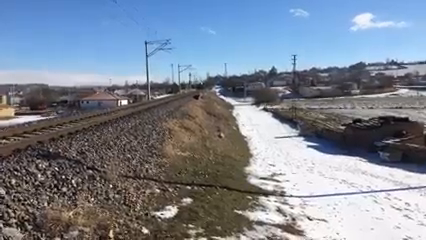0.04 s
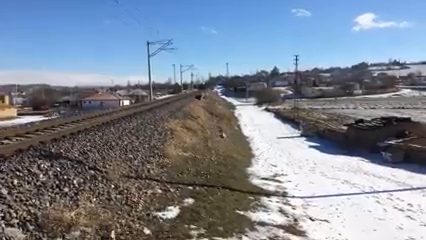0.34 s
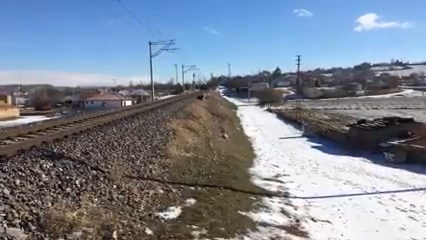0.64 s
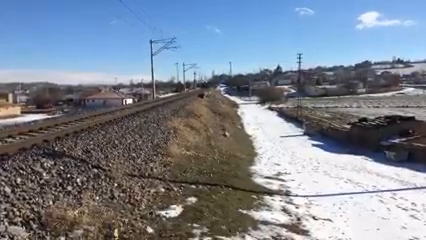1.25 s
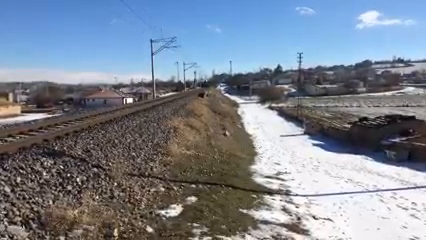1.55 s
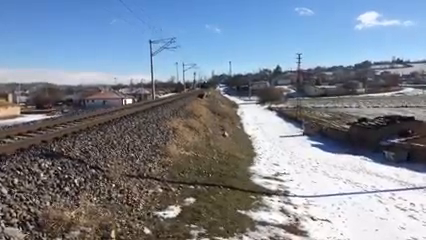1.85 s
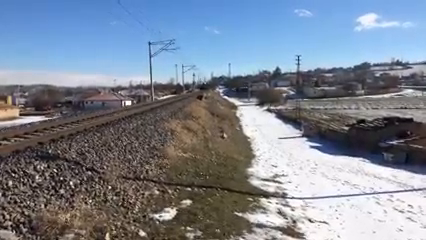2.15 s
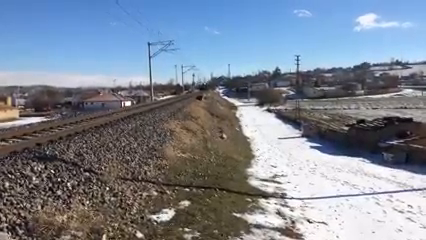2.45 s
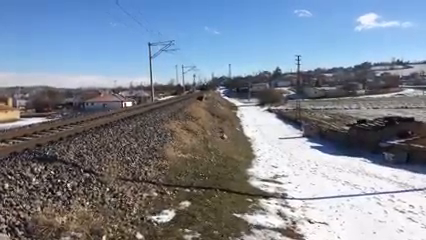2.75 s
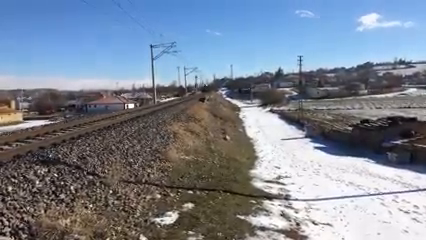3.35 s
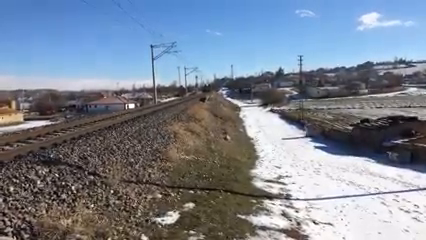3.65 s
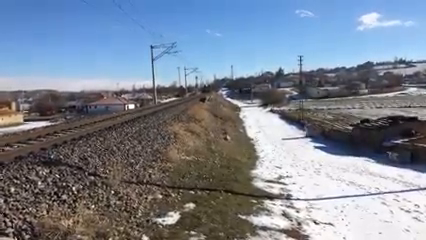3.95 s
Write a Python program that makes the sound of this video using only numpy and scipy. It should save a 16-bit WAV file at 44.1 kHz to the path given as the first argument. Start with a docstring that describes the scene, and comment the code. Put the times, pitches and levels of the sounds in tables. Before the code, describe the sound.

A distant train sets the rails ringing with steady metallic tones, and its roar slowly grows as it nears. Light wind rumbles on the microphone beside the track, bumping it several times midway, over faint open-country hiss.

```python
"""Snowy country, beside an empty track: the rails sing with a train that is still far away.
Its rolling wheels shake the steel, which rings in narrow bands; the roar grows and fills in as it nears.
Light wind rumbles on the microphone and its eddies bump it a few times.
Faint rustles, a tick and two distant chirps lie in the outdoor hiss."""
import sys
import numpy as np
from scipy.fft import rfft, irfft, next_fast_len
from scipy.io import wavfile
from scipy.ndimage import uniform_filter1d, map_coordinates

SR = 44100
rng = np.random.default_rng(int(sys.argv[2]) if len(sys.argv) > 2 else 0)


def generate_wav(sig):
    """Save sig (samples, or channels by samples) to the path in sys.argv[1] as 16-bit PCM at SR."""
    pcm = np.round(np.clip(np.atleast_2d(sig).T, -1, 1) * 32767).astype(np.int16)
    wavfile.write(sys.argv[1], SR, pcm)


N = 176400


def amp(db):
    """Decibels to gain."""
    return 10 ** (np.asarray(db) / 20)


def unit(x):
    """Scale to rms 1."""
    return x / np.sqrt(np.mean(x ** 2) + 1e-20)


def curve(rows):
    """One value per sample from (time [s], value) rows."""
    return np.interp(np.arange(N) / SR, *np.transpose(rows))


def swell(centre_s, half_s):
    """Gaussian rise and fall, peak 1."""
    return np.exp(-((np.arange(N) / SR - centre_s) / half_s) ** 2)


def wobble(knots_per_s):
    """Smooth random curve."""
    return map_coordinates(rng.standard_normal(2000), [np.arange(N) * knots_per_s / SR], mode="mirror")


def filtered(x, response):
    """Apply a gain given as a function of frequency [Hz]."""
    size = next_fast_len(N + SR // 2)
    hz = np.fft.rfftfreq(size, 1 / SR)
    return irfft(rfft(x, size) * response(hz), size)[:N]


def noise(response):
    """Filtered white noise, rms 1."""
    white = rng.standard_normal(next_fast_len(N + SR // 2))
    return unit(filtered(white, response))


def coloured(spectrum):
    """Noise, rms 1, shaped by (frequency [Hz], density [dB]) rows on a log axis."""
    knots_hz, db = np.transpose(spectrum)
    return noise(lambda hz: amp(np.interp(np.log(hz + 1), np.log(knots_hz + 1), db)))


def evened(x, window_s=0.14):
    """Even out slow swings of level; rms 1."""
    power = np.abs(uniform_filter1d(x ** 2, int(window_s * SR))) + 1e-6
    return unit(x / np.sqrt(power))


def ringing(centre_hz, width_hz):
    """Steep-sided resonance shaken at random, steady in level."""
    return evened(noise(lambda hz: 1 / (1 + ((hz - centre_hz) / (0.66 * width_hz)) ** 2)))


def rails(roar_db=-5, roar_growth=1.69, flutter_db=1):
    """Nearing wheels drive the rail resonances and the roar between them, each at its own growth rate."""
    # rolling strength (time [s], level [dB])
    approach = [(0, -42.5), (.4, -41.5), (.55, -41), (.9, -41.3), (1.08, -43), (1.3, -40.5), (1.55, -41),
                (2, -39.5), (2.14, -40.5), (2.3, -38), (2.78, -39), (2.9, -36.7), (3.25, -36.5),
                (3.75, -35.5), (3.92, -34.5)]
    # rail resonances (centre [Hz], width [Hz], level re rolling [dB], growth [dB per dB of approach])
    modes = [(406.5, 17.4, -23, 1.2), (451.6, 25.4, -12.5, 1), (471.6, 15.8, -13, 1.38),
             (579, 88, -16.5, 0.5), (649.4, 18.4, -12.5, 0.47), (710.4, 23, -13, .5), (759, 53, -14.5, 1.2),
             (1035, 31.4, -6, 1.23), (1100, 36, -12.5, 0.2), (1258, 46, -14.5, 1), (1316, 30, -18.5, 1.5),
             (1853.4, 25, -24, 1), (1957, 52, -31.5, 0), (2814, 27, -45.5, 1.5), (3866, 59, -37, .5),
             (4410, 33, -42, 0.5), (6125, 54, -42.5, 1.45), (7110, 250, -35, 0.6), (7140, 56, -40.5, 0.7),
             (12400, 450, -41.5, .8), (12700, 500, -45.5, 1.2), (13718, 60, -47, 0.7)]
    # broad roar (frequency [Hz], relative density [dB])
    roar_spectrum = [(250, -50), (350, -20.5), (420, -14), (470, 0), (500, -20.5), (620, -0.5), (740, 1),
                     (900, -1.5), (1040, 3.5), (1180, -5), (1330, -6.5), (1420, -24), (1600, -20),
                     (1800, -10), (1900, -22), (2400, -34), (4300, -33.5), (5600, -44), (10000, -81),
                     (11500, -41.5), (12600, -44.5), (15000, -60)]
    rolling_db = curve(approach)
    mean_db = rolling_db.mean()
    near_db = rolling_db - mean_db
    ring = sum(amp(db + growth * near_db) * ringing(hz, width_hz) for hz, width_hz, db, growth in modes)
    roar = amp(roar_db + roar_growth * near_db) * coloured(roar_spectrum)
    uneven_rolling = amp(mean_db + flutter_db * wobble(knots_per_s=35))
    return uneven_rolling * (ring + roar)


def wind():
    """The breeze rumbles on the microphone."""
    # wind strength (time [s], level [dB])
    strength = [(0, -44.5), (.55, -44), (1.1, -48), (1.75, -50), (2.25, -43.5), (2.52, -38), (2.72, -42.5),
                (3, -46.5), (4, -45.5)]
    # rumble (frequency [Hz], relative density [dB])
    spectrum = [(20, -34), (34, -21), (43, 5.5), (55, -1.5), (85, -1.5), (120, -8.5), (160, -16),
                (250, -26.5), (400, -31.5), (1000, -74)]
    return amp(curve(strength)) * evened(coloured(spectrum))


def bumps(puff_db=-21, puff_half_s=0.01):
    """Each eddy is one short, low swing of pressure with a puff of turbulence inside."""
    # eddies (time [s], envelope peak [dB], pitch [Hz], half length [cycles])
    eddies = [(0.834, -30, 138, 0.6), (1.961, -33, 102, 1), (2.138, -30.5, 91, 0.7),
              (2.232, -22, 109, 0.61), (2.364, -29, 102, 1), (2.417, -27, 125, 0.81),
              (2.464, -30, 100, 0.64), (2.528, -22, 100, 0.54), (2.618, -31.5, 113, 0.88)]
    # turbulence (frequency [Hz], relative density [dB])
    puff_spectrum = [(90, -14), (170, 4.5), (260, -6), (400, -18), (800, -49), (2000, -120)]
    t, out = np.arange(N) / SR, np.zeros(N)
    turbulence = amp(puff_db) * coloured(puff_spectrum)
    phases = rng.uniform(0, 2 * np.pi, len(eddies))
    for (at_s, db, hz, half_cycles), phase in zip(eddies, phases):
        cycles = (t - at_s) * hz
        envelope = (1 + (cycles / half_cycles) ** 2) ** -1.5
        swing = envelope * np.sin(2 * np.pi * cycles + phase)
        out += amp(db) * (swing + turbulence * swell(at_s, puff_half_s))
    return out


def rustles():
    """Soft, grainy swells of treble close to the microphone."""
    # rustles (time [s], half length [s], level [dB])
    events = [(0.923, .035, -70.5), (1.012, .04, -72.5), (1.69, 0.057, -74)]
    # rustle noise (frequency [Hz], relative density [dB])
    spectrum = [(1500, -20), (4000, 0), (9000, -2), (10200, -18), (11500, -7), (14000, -6), (16000, -18)]
    envelope = sum(amp(db) * swell(at_s, half_s) for at_s, half_s, db in events)
    grain = amp(4 * wobble(knots_per_s=400))
    return envelope * unit(grain * coloured(spectrum))


def tick(at_s=1.9276, t60_s=0.0014):
    """Tiny, dry click of fast-decaying modes."""
    # click modes (frequency [Hz], initial level [dB])
    modes = [(5800, -47), (7600, -45), (13800, -47)]
    age_s = np.maximum(np.arange(N) / SR - at_s, 0)
    return sum(amp(db - 60 * age_s / t60_s) * np.sin(2 * np.pi * hz * age_s) for hz, db in modes)


def chirps(half_s=0.049, width_hz=81):
    """Two short, thin notes, blurred by distance."""
    # chirps (time [s], pitch [Hz], level [dB])
    notes = [(1.12, 2900, -71), (1.41, 2820, -67)]
    return sum(amp(db) * swell(at_s, half_s) * ringing(hz, width_hz) for at_s, hz, db in notes)


def air():
    """Faint hiss of still air over the fields."""
    # hiss strength (time [s], level [dB])
    strength = [(0, -58.5), (.6, -58.5), (1.2, -56.5), (2.2, -56.5), (4, -59)]
    # hiss (frequency [Hz], relative density [dB])
    spectrum = [(100, -4.5), (300, -4), (1500, -1), (2400, -11), (3400, -15.5), (4500, -16.5), (5500, -27),
                (7500, -30), (9400, -26.5), (9900, -39), (10500, -43), (10750, -28.5), (12400, -31),
                (14000, -32), (14800, -32), (15600, -32)]
    return amp(curve(strength)) * coloured(spectrum)


def scene():
    """All sources at one microphone."""
    return (air() + rails() + wind() + bumps() + rustles() + chirps() + tick())[None]


def record(dry):
    """Brick-wall low-pass."""
    top_hz = 15700
    return np.array([filtered(x, lambda hz: hz < top_hz) for x in dry])


dry = scene()
out = record(dry)
generate_wav(out)
```